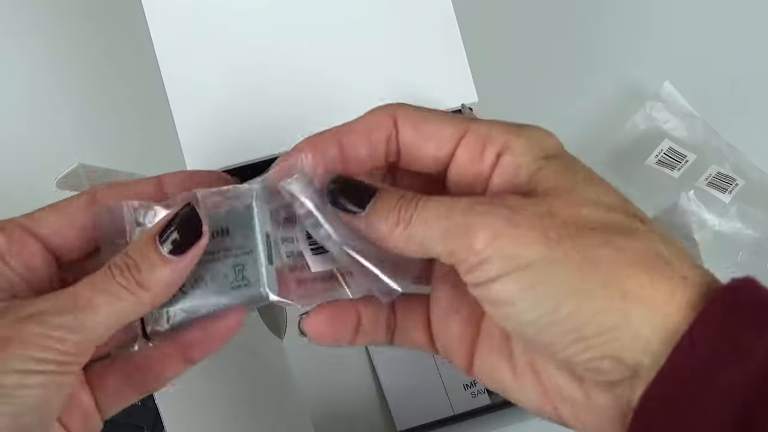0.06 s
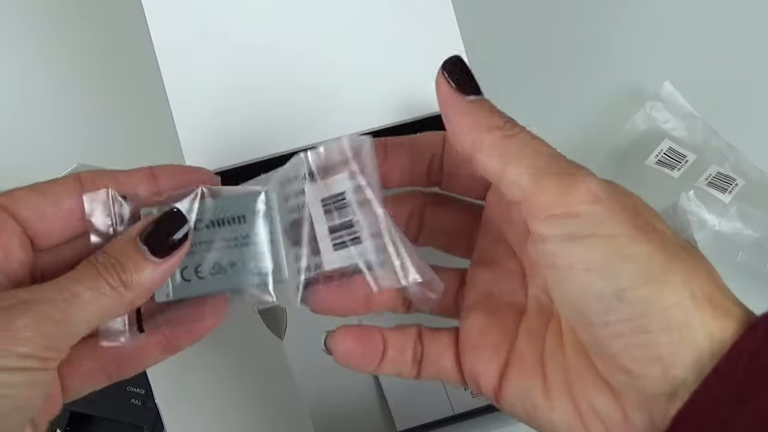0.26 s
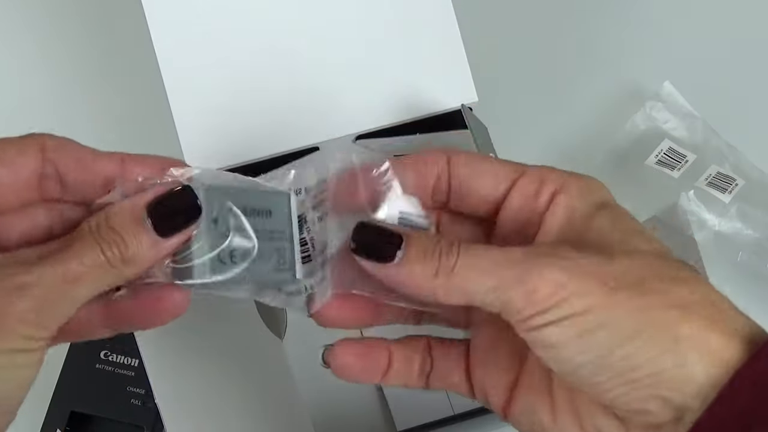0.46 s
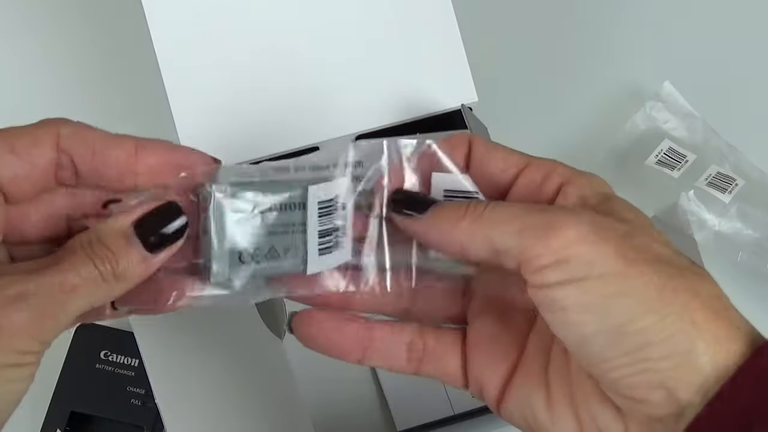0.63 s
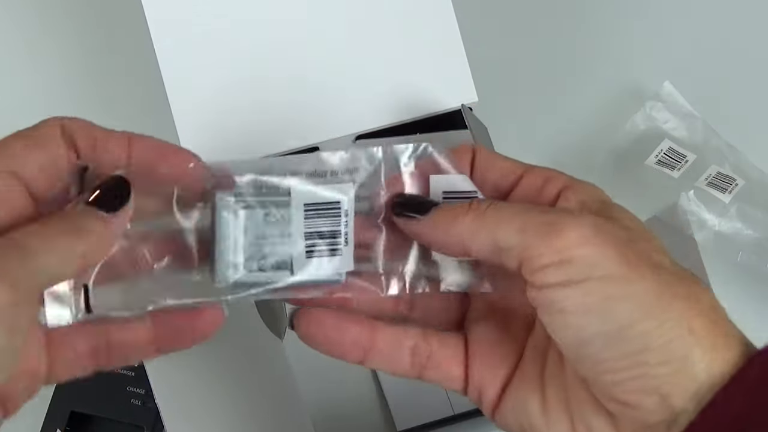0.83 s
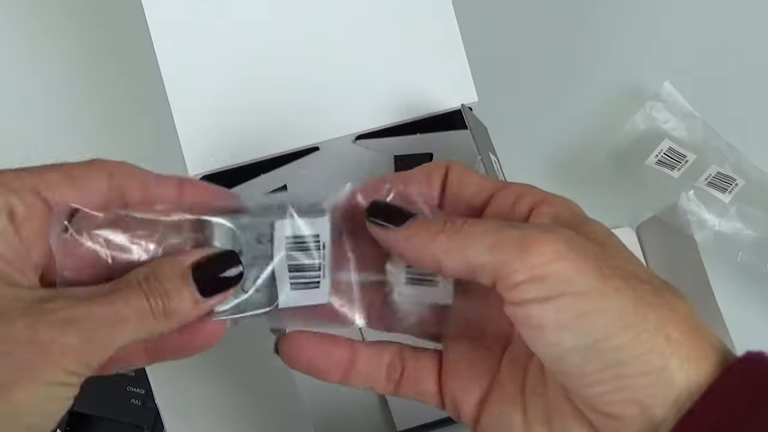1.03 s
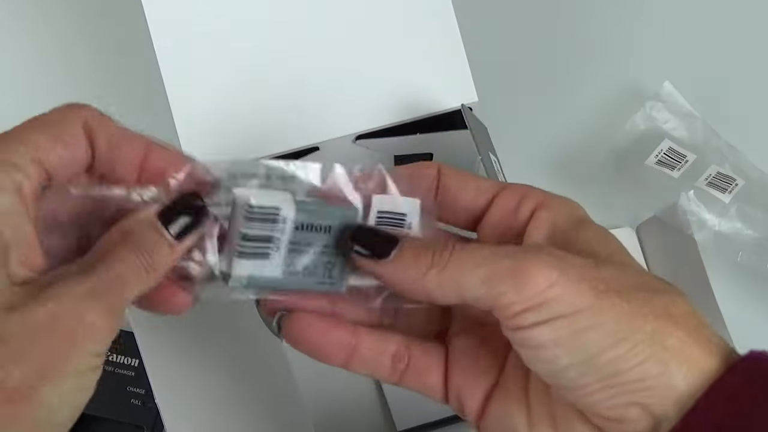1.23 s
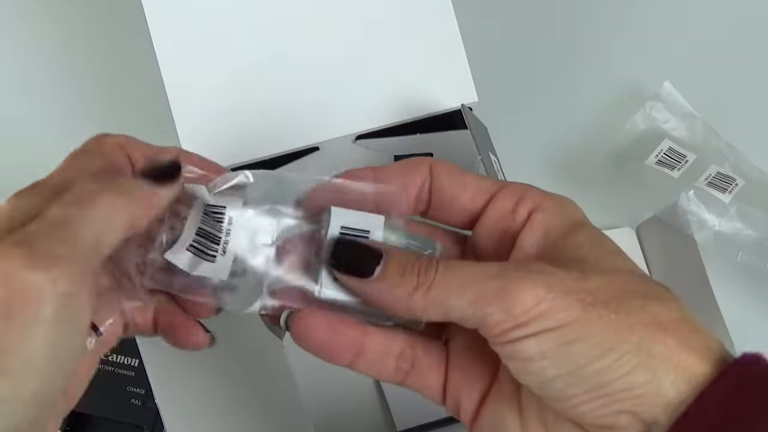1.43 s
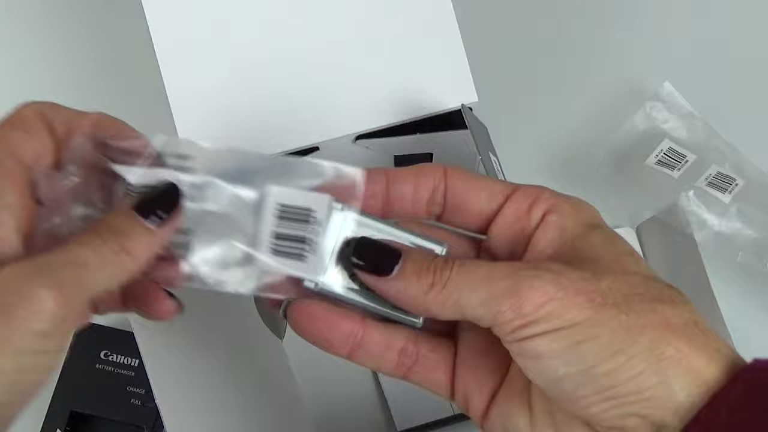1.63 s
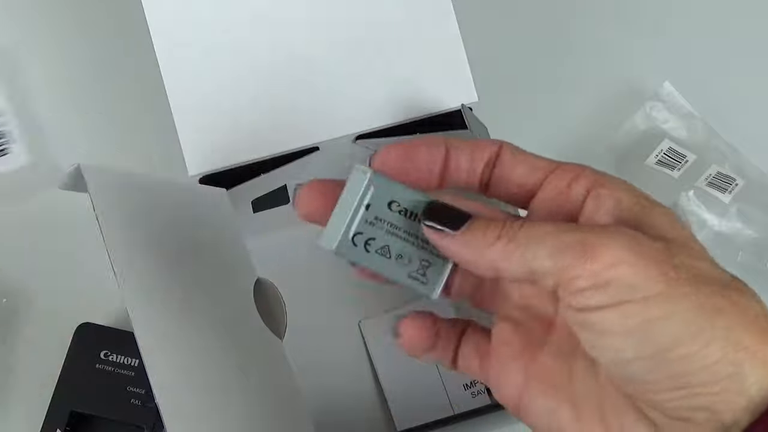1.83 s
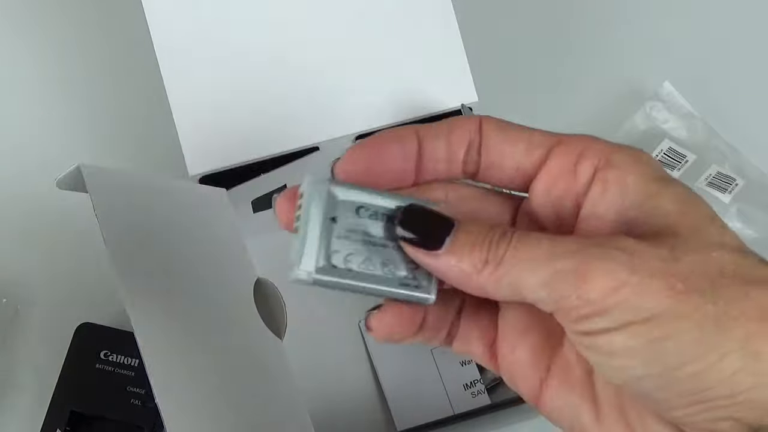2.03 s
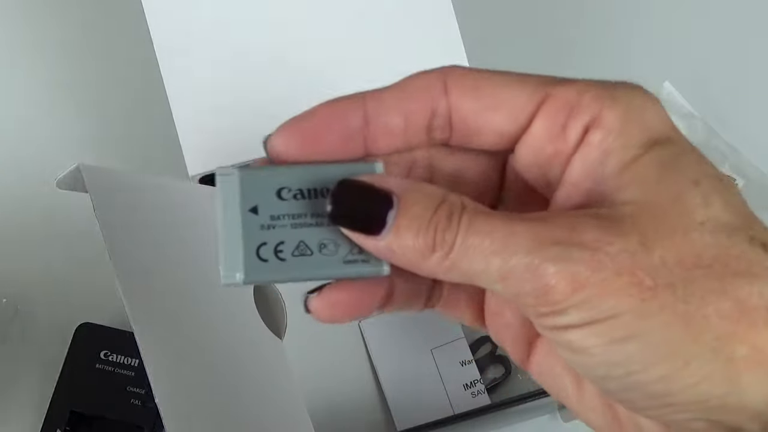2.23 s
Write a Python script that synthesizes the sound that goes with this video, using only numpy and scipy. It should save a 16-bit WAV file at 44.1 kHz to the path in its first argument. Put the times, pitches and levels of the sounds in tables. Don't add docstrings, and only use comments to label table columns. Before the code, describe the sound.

A thin plastic bag crackles close to stereo microphones in a small quiet room. Crisp snaps and fine rustle run from 0 to 0.9 seconds, with lower pops and soft battery knocks. After a brief lull near 1 second, a dense pulling crackle lasts until 1.5. A short burst follows around 1.65 as the bag comes away, then sparse snaps drift slightly left until 2.2, over faint low hum.

```python
import sys
import numpy as np
from scipy import signal
from scipy.fft import rfft, irfft, next_fast_len
from scipy.io import wavfile
from scipy.ndimage import map_coordinates

SR = 44100
rng = np.random.default_rng(int(sys.argv[2]) if len(sys.argv) > 2 else 0)


def attenuation_scalar(level_db):
    decades = np.asarray(level_db, float) / 20
    return 10 ** decades


def transcribe(signal):
    frames = np.atleast_2d(signal).T
    limited = np.clip(frames, -1, 1)
    pcm = np.round(limited * 32767).astype(np.int16)
    wavfile.write(sys.argv[1], SR, pcm)


N = 99710

# (frequency [Hz], level [dB])
FILM_COLOUR = [(40, -49), (316, -9), (600, -10.5), (1100, -7), (3730, -6.5), (6600, -6), (10800, -3.5),
               (15000, -15)]
SNAP_DB = -4


def along(points, hz):
    f, v = np.transpose(points)
    return np.interp(np.log(hz + 1), np.log(f + 1), v)


def unit(x):
    return x / np.sqrt(np.mean(x ** 2, axis=-1, keepdims=True) + 1e-20)


def coloured(x, points):
    size = next_fast_len(N + 8192)
    gain = attenuation_scalar(along(points, np.fft.rfftfreq(size, 1 / SR)))
    return irfft(rfft(x, size) * gain, size)[..., :N]


def wobble(rate):
    knots = rng.standard_normal(int(N * rate / SR) + 4)
    return map_coordinates(knots, [np.arange(N) * rate / SR])


def air():
    # (frequency [Hz], level [dB])
    hum_colour = [(40, -19), (150, -19), (320, 3.5), (750, 1), (3000, -11), (15000, -48)]
    common, own = unit(coloured(rng.standard_normal((2, N)), hum_colour))
    return attenuation_scalar(-51.5) * np.array([common + 0.25 * own, common - 0.25 * own])


def room(x):
    t60_s = .15
    t = np.arange(SR // 3) / SR
    noise = rng.standard_normal((3, len(t))) * attenuation_scalar(-60 * t / t60_s)
    tail = noise[0] + 0.067 * noise[1:]
    late = np.pad(x, (150, 0))[None]
    return signal.fftconvolve(late, tail / np.linalg.norm(noise[0]), axes=1)[:, :N]


def knocks():
    # (time [s], peak level [dB])
    bumps = [
        (0.24, -24),
        (0.731, -25.5),
        (0.79, -26),
        (1.657, -24),
        (1.793, -26),
        (1.6, -31),
        (1.3, -33),
        (0.87, -27.5),
        (1.88, -32.5),
    ]
    # (frequency [Hz], level [dB], decay time t60 [s])
    case_modes = [(340, 1, .045), (760, -4, .05)]
    out, t = np.zeros(N + SR), np.arange(SR // 5) / SR
    soft_onset = (1 - np.exp(-t / 0.0025)) ** 2
    for s, db in bumps:
        ring = 0
        for hz, level, t60 in case_modes:
            bent_hz = hz * rng.normal(1, .05)
            ring = ring + attenuation_scalar(level - 60 * t / t60) * np.sin(2 * np.pi * bent_hz * t)
        out[round(s * SR):][:len(t)] += attenuation_scalar(db) * ring * soft_onset
    return out[:N]


def effort_db(s):
    # (time [s], level [dB])
    handling = [(0, -31), (.2, -34.5), (.33, -40.5), (.36, -36), (.62, -34), (.75, -34), (.935, -29.5),
                (.955, -38.5), (1.03, -45.5), (1.05, -30), (1.48, -28.5), (1.56, -41), (1.63, -40),
                (1.65, -22.5), (1.77, -35.5), (1.92, -45), (2.05, -33.5), (2.26, -40.5)]
    return np.interp(s, *np.transpose(handling))


def rustle():
    count = int(380 * N / SR)
    u, g = rng.random((count, 2)), rng.standard_normal((count, 2))
    s = u[:, 0] * N / SR
    db = 1.25 * effort_db(s) + .5 - 5 * np.log(u[:, 1] + 0.11)
    hz = 2700 * np.exp(.45 * g[:, 0])
    bright_db = -4 + 5 * g[:, 1]
    buckles = snaps(np.array([s, db, hz, bright_db]).T)
    slide_db, slide_wobble_db = -5.5, 6.5
    swell = attenuation_scalar(effort_db(np.arange(N) / SR) + slide_db + slide_wobble_db * wobble(44.76))
    return buckles + swell * unit(coloured(rng.standard_normal(N), FILM_COLOUR))


def pops():
    # (time [s], peak level [dB], pitch [Hz])
    panels = [(.083, -23, 795), (.117, -19, 1150), (0.215, -33, 1180), (0.284, -22, 1360),
              (0.454, -23, 970), (.733, -20, 840), (0.762, -11, 1170), (.875, -17, 1120),
              (1.253, -18, 1200), (1.303, -16.5, 1200), (1.314, -10.5, 1010), (1.655, -13.5, 1026),
              (1.658, -18.5, 745), (1.668, -25, 457), (1.757, -20, 1140), (2.114, -19, 1390)]
    t60_cycles = 13.8
    out, t = np.zeros(N + SR), np.arange(SR // 20) / SR
    for s, db, hz in panels:
        decay = attenuation_scalar(db - 60 * t * hz / t60_cycles)
        onset = 1 - np.exp(-t * hz * 2)
        out[round(s * SR):][:len(t)] += decay * np.sin(2 * np.pi * hz * t) * onset
    return out[:N]


def ticks():
    # (time [s], body level [dB], bright part over body [dB])
    small = [(.0240, -19, -16), (.0440, -28, -6), (0.1085, -22, 2), (0.1582, -22, -5), (0.1723, -19, -18),
             (0.2971, -17.5, -24), (.3520, -17.5, -9), (0.3628, -22, -16), (.3875, -18.5, -5),
             (0.4322, -17, -17), (0.5197, -18, -11), (0.6764, -15.5, -5), (0.7252, -19.5, 5),
             (.7340, -12, 1), (.7447, -17.5, 3), (0.8098, -19, -16), (0.834, -23, -4), (.8390, -18.5, -17),
             (.8470, -18.5, -18), (0.8562, -19.5, -18), (0.8886, -18, -9), (0.8954, -10, 1),
             (0.926, -33, 17), (0.93, -33.5, 17.5), (1.0434, -24, -6), (1.0476, -19, -14),
             (1.0848, -31, -11), (1.1359, -20, -4), (1.1520, -21, 4.5), (1.1565, -15.5, -14),
             (1.1648, -17.5, -5), (1.1824, -16.5, -9), (1.1882, -19, 1), (1.2418, -13.5, -4),
             (1.266, -41, 17), (1.3087, -20, -13), (1.3203, -12, -3), (1.3253, -16, 4.5), (1.337, -20, 4),
             (1.3894, -26, 9), (1.476, -16, -8), (1.6582, -21, -2), (1.6689, -26, -3), (1.6758, -30, -4),
             (1.6875, -40, 3), (1.6970, -29, 1), (1.701, -44, 20), (1.7595, -28, 3), (1.8007, -28.5, -15),
             (1.853, -30.5, -5), (1.952, -35, 6), (1.9880, -26, -23), (2.0355, -20, -17),
             (2.1280, -25, -12)]
    s, db, bright_db = np.transpose(small)
    hz = 3300 * np.exp(.2 * rng.standard_normal(len(s)))
    return attenuation_scalar(SNAP_DB) * snaps(np.array([s, db, hz, bright_db]).T)


def snaps(rows, size=1024):
    s, db, hz, bright_db = np.transpose(rows)[:, :, None]
    head_s, tail_s, tail_db = .00017, .0028, -11
    lead = 64
    head_vary, spit_vary, table_vary = np.exp(
        rng.standard_normal((len(s), 3, 1)) * [[.4], [.18], [.3]]).transpose(1, 0, 2)[:, :, None]

    t = np.maximum(np.arange(size) - lead, 0) / SR
    u = t / (head_s * head_vary)
    burst = u ** 3 * np.exp(-u) + attenuation_scalar(tail_db) * (1 - np.exp(-u)) * np.exp(-t / tail_s)
    flip = 2.19 * np.exp(-((u - 2) * head_s * head_vary * SR) ** 2)

    f = np.fft.rfftfreq(size, 1 / SR)
    z = rfft(rng.standard_normal((len(s), 2, size)) * burst.swapaxes(0, 0) + 2 * flip)
    z *= attenuation_scalar(along(FILM_COLOUR, f))
    table_db, table_s = -6, 0.001096
    z *= 1 + attenuation_scalar(table_db) * np.exp(-2j * np.pi * f * table_s * table_vary)
    z *= f ** 3 / (f ** 3 + 480 ** 3)
    high = 1 / (1 + (6600 / (f + 1)) ** 10)

    def ring(centre_hz):
        damping = 1j * f * centre_hz / 1.8
        return damping / (centre_hz * centre_hz - f * f + damping) + attenuation_scalar(-15.5)

    body = unit(irfft(z[:, 0] * ring(hz) * (1 - high)))
    spit = unit(irfft(z[:, 1] * ring(10800 * spit_vary[:, 0]) * high))
    grain = attenuation_scalar(db) * (body + attenuation_scalar(bright_db) * spit) * np.sqrt(0.0016 * SR / size)
    start = np.round(np.maximum(s - 2 * head_s, 0) * SR).astype(int)
    at = start + np.arange(size)
    return np.bincount(at.ravel(), grain.ravel(), N + 2 * size)[lead:N + lead]


def creases():
    # (time [s], body level [dB], body pitch [Hz], bright part over body [dB])
    main_snaps = [(0.0064, -6.5, 2530, -8), (0.0129, -23, 2500, 3), (0.054, -12.5, 2900, -25),
                  (0.0696, -16.5, 1530, -25), (0.0838, -5, 2570, -8), (0.0941, -9.5, 4440, -1),
                  (0.1179, -13, 1590, -20), (0.179, -18, 2190, -12), (0.2173, -8.5, 2570, -3),
                  (0.2292, -10.5, 3100, 1.5), (0.2857, -13, 2290, 2.5), (0.3422, -10, 3550, -16),
                  (0.3548, -11, 3030, -2.5), (0.3715, -7.5, 3560, -10), (0.3798, -13, 4930, 3.5),
                  (0.3948, -10, 4700, 0.5), (0.403, -7.5, 4000, -5), (0.4274, -11, 3320, -6),
                  (0.4391, -13, 3960, -9), (0.4549, -12, 3610, 6), (0.4725, -21.5, 4090, 13),
                  (0.4759, -9, 3700, 1.5), (0.4912, -9, 3430, 1),
                  (0.504, -13, 3730, -5), (0.5274, -11, 3500, -13), (0.533, -12.5, 3270, 7),
             (0.5835, -22, 2580, -8), (0.596, -14.5, 3500, -6), (0.6256, -8, 3740, -3),
             (0.644, -18, 3330, -6), (0.6651, -36.5, 4480, 26), (0.6803, -10, 3900, 1),
             (0.6845, -10.5, 3960, 3), (0.6971, -22, 4280, 13), (0.7177, -10.5, 4670, 0),
             (0.7316, -14, 3660, 3), (0.7521, -11.5, 2460, -5.5), (0.756, -12, 4030, 0),
             (0.761, -8, 3250, 0.5), (0.7783, -11, 3800, -5), (0.7875, -10.5, 3670, -1),
             (0.7925, -11.5, 4460, -4), (0.8202, -21, 4130, 11.5), (0.861, -13.5, 3700, 3),
             (0.8654, -8.5, 3820, 0.5), (0.8762, -10, 1590, -7), (0.8914, -15.5, 4250, 9),
             (0.9033, -13, 4230, -3), (0.971, -21.5, 1310, -31), (1.02, -24, 1430, -16),
                  (1.0527, -12.5, 2880, -7), (1.06, -10.5, 3300, -1), (1.0651, -13, 3440, -22),
            (1.0999, -7, 5000, -3.5), (1.1226, -12.5, 3970, 3), (1.143, -10.5, 4050, 0.5),
            (1.1714, -14.5, 4900, 3.5), (1.1759, -12.5, 5130, 2.5), (1.194, -8, 3600, -2),
            (1.2222, -30.5, 4720, 24), (1.2275, -16, 4130, 4.5), (1.2536, -17.5, 3500, 8.5),
            (1.2849, -25, 4790, 14), (1.3035, -10, 3930, -0.5), (1.315, -11, 1970, -4),
            (1.3312, -11, 3300, -5.5), (1.344, -15, 5600, 5), (1.3528, -8, 2180, -10),
            (1.3573, -9.5, 2830, -1.5), (1.3687, -21, 2770, -7), (1.393, -9.5, 3370, -1.5),
            (1.4046, -6.5, 4900, -12), (1.4092, -30.5, 2940, 18.5), (1.4186, -25, 4290, 13.5),
            (1.4417, -15, 3490, -13), (1.4579, -9, 3930, 0.5), (1.4701, -13, 2530, 0),
                  (1.4926, -9, 3230, -2), (1.59, -17, 2310, -26), (1.5966, -17.5, 4300, 4.5),
                (1.602, -17, 1920, -12), (1.6332, -13, 2550, -19), (1.6409, -15.5, 3100, 0.5),
                (1.6443, -11.5, 2870, -1), (1.6539, -14.5, 1430, -5), (1.6616, -12, 2960, -4),
                (1.7055, -10, 3300, -1.5), (1.7495, -17, 3880, -5), (1.7663, -13, 2920, 3),
                (1.8846, -19, 2200, -19), (2.0122, -9, 2950, -10.5), (2.0396, -21, 2840, -3),
                (2.05, -20, 4030, 8.5), (2.0646, -19, 2970, -6), (2.084, -24, 3500, -8),
                (2.1145, -9, 3380, -27), (2.143, -15.5, 3000, -17), (2.156, -22.5, 4900, 3.5),
                (2.2038, -22, 3740, -4), (2.219, -24, 1720, -8.5)]
    return attenuation_scalar(SNAP_DB) * snaps(main_snaps)


def scene():
    # (frequency [Hz], side over middle [dB])
    width_colour = [(300, -24), (2000, -11), (4500, -9.5), (12000, -14.5)]
    # (time [s], half of left over right [dB])
    lean = [
        (0, 0.58),
        (1.8, 0.2),
        (2.0, 2.2),
    ]
    bag = creases() + rustle() + knocks() + ticks() + pops()
    turning = attenuation_scalar(wobble(33.2)) * np.tanh(wobble(12))
    side = turning * coloured(signal.hilbert(bag).imag, width_colour)
    lean_db = np.interp(np.arange(N) / SR, *np.transpose(lean))
    direct = bag * attenuation_scalar(lean_db * [[1], [-1]]) + side * [[1], [-1]]
    return direct + attenuation_scalar(-15) * room(bag) + air()


def roll_off(x):
    return signal.sosfilt(signal.butter(12, 16640, fs=SR, output="sos"), x)


def record(dry):
    # (frequency [Hz], level [dB])
    mic_response = [(90, 3), (230, 1.5), (5900, -0.5), (6650, -4.5), (7500, -1)]
    x = coloured(dry, mic_response + [(15900, 0), (16150, -50)])
    limited = x / (1 + np.abs(x) ** 6) ** (1 / 6)
    return roll_off(limited)


dry = scene()
out = record(dry)
transcribe(out)
```